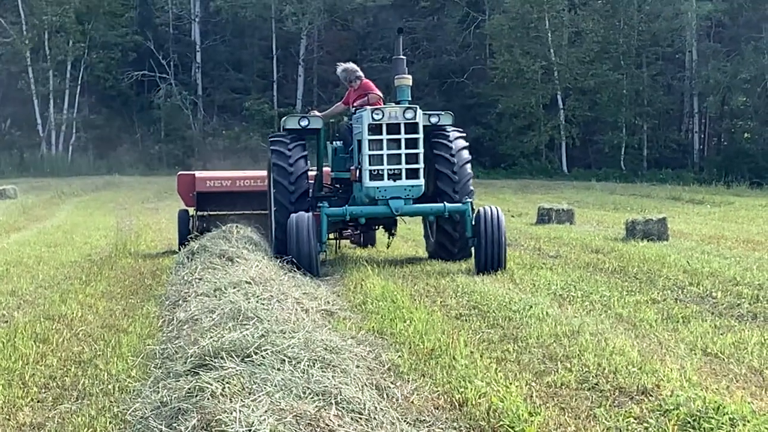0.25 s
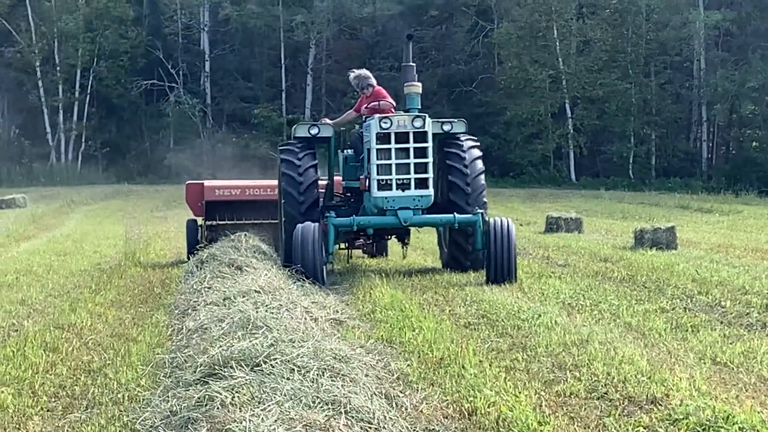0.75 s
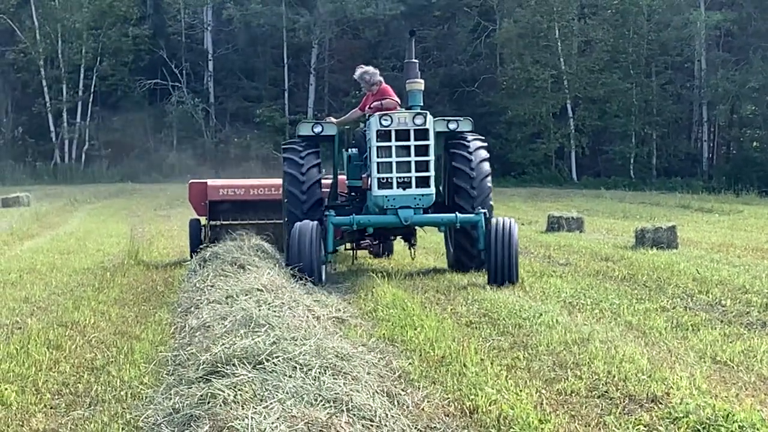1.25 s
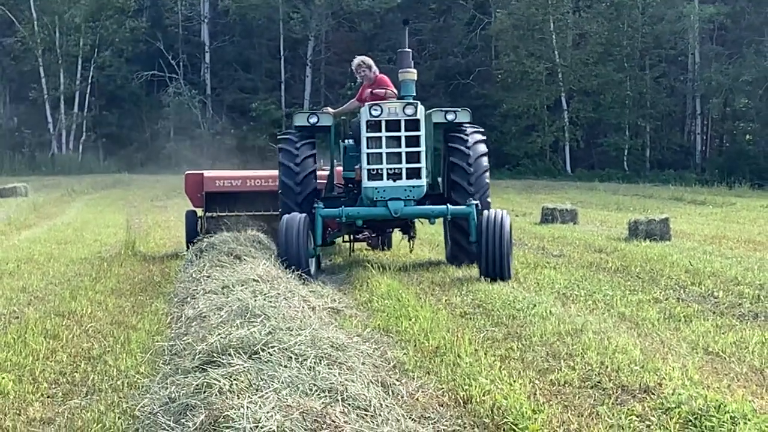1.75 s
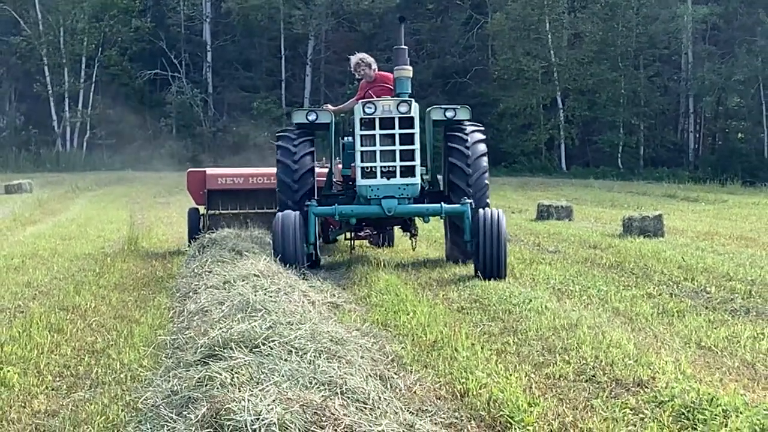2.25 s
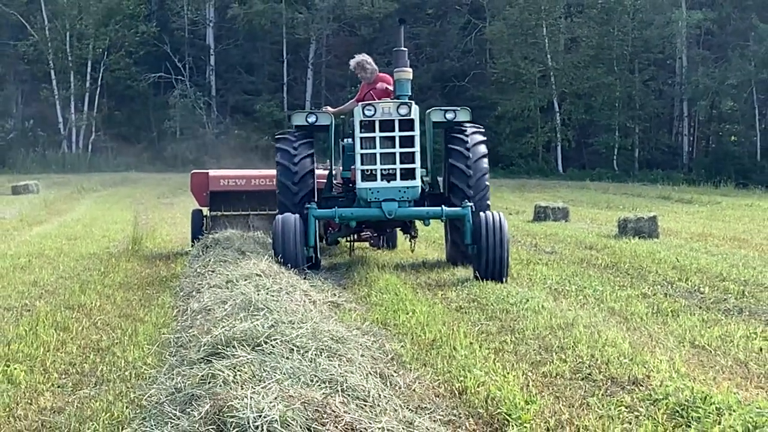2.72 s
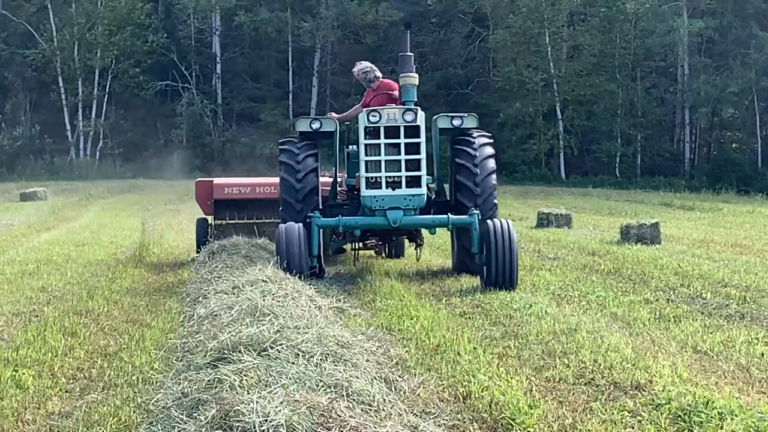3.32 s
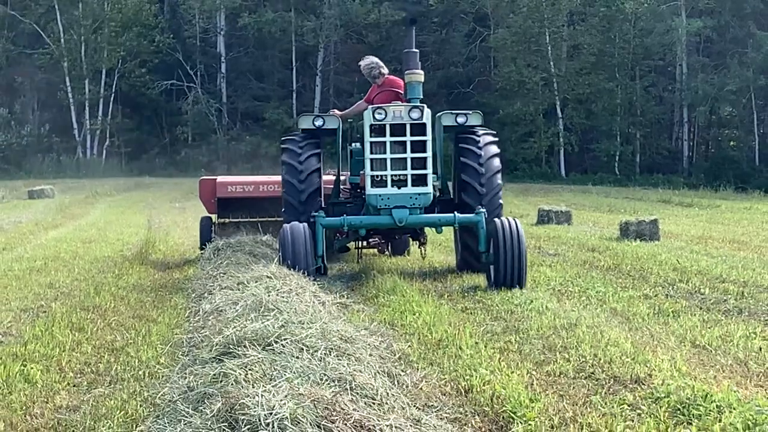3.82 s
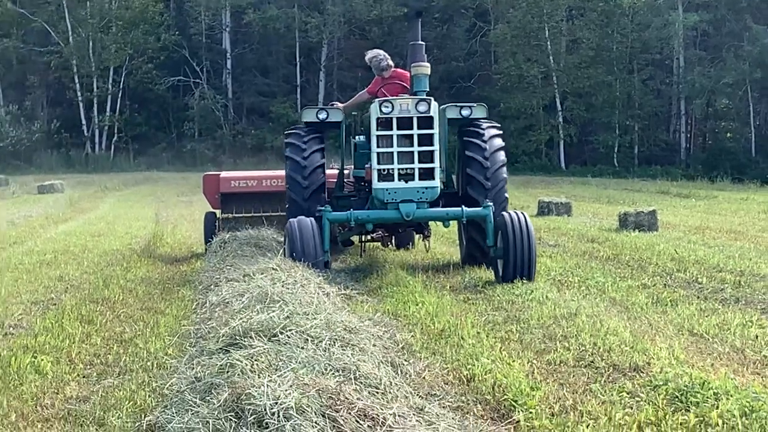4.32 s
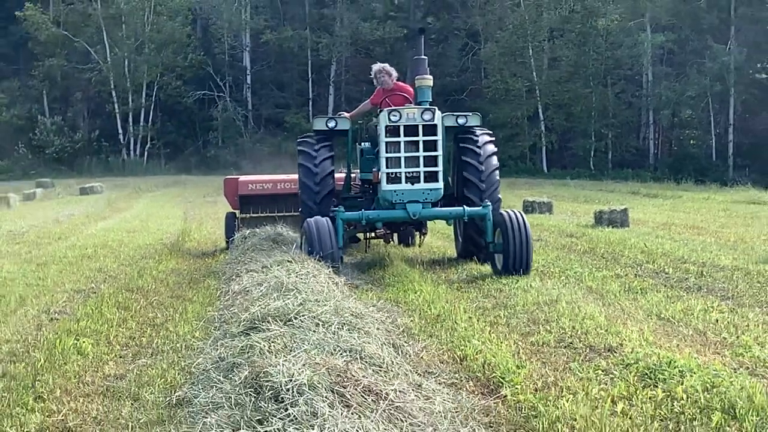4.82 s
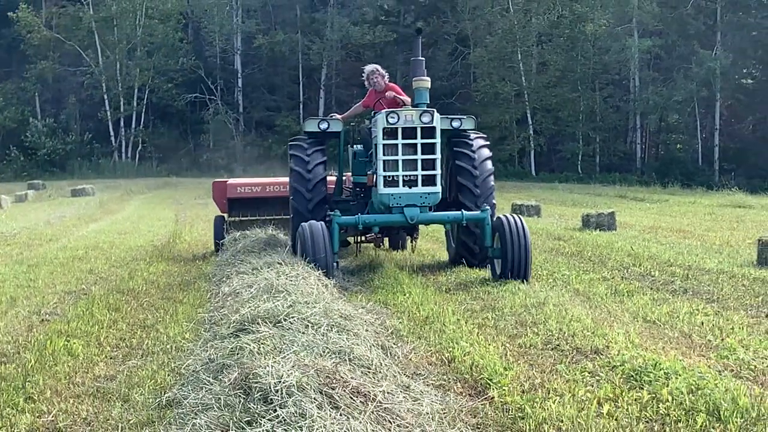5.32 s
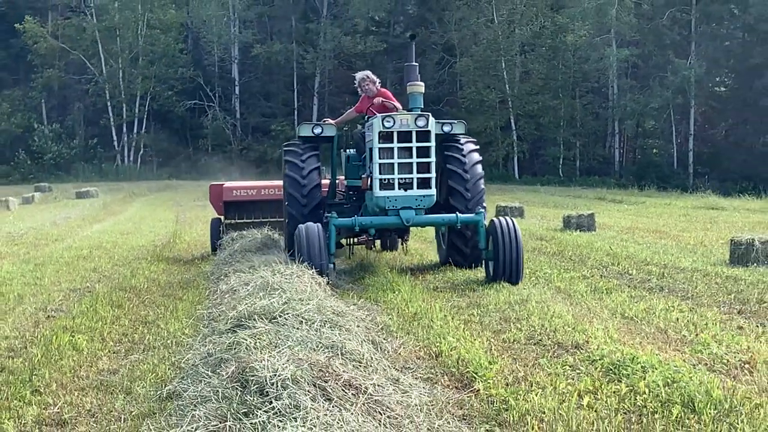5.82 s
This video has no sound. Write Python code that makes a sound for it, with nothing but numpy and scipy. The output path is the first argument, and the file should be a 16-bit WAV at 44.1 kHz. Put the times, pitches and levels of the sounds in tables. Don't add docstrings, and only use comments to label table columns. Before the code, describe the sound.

A diesel tractor drones steadily nearer across an open field, its engine sagging under each baler stroke while metal tines and chains rattle.

```python
import sys
import numpy as np
from scipy import signal
from scipy.fft import rfft, irfft, next_fast_len
from scipy.io import wavfile
from scipy.ndimage import uniform_filter1d, map_coordinates

SR = 44100
rng = np.random.default_rng(int(sys.argv[2]) if len(sys.argv) > 2 else 0)


def unload_wav(signal):
    wavfile.write(
        sys.argv[1],
        SR,
        np.round(np.clip(np.atleast_2d(signal).T, -1, 1) * 32767).astype(np.int16),
    )


def makeup_ratio(level_db):
    decades = np.asarray(level_db, float) / 20
    return 10 ** decades


N = 267687


def unit(x):
    return x / np.sqrt(np.mean(x ** 2) + 1e-20)


def cosine(turns):
    return np.cos(2 * np.pi * turns)


def along(points, hz):
    f, v = np.transpose(points)
    return np.interp(np.log(hz + 1), np.log(f + 1), v)


def wobble(knots_per_s):
    knots = rng.standard_normal(int(N * knots_per_s / SR) + 4)
    return map_coordinates(knots, [np.arange(N) * knots_per_s / SR])


def bumps(times_s, sizes, rise_s, fall_s):
    u = np.arange(0, N + 64, 64)[:, None] / SR - np.asarray(times_s)
    bells = np.exp(-.5 * (u / np.where(u < 0, rise_s, fall_s)) ** 2)
    total = bells @ np.asarray(sizes)
    return np.interp(np.arange(N) / 64, np.arange(len(total)), total)


def filtered(x, response):
    m = next_fast_len(N + 8192)
    return irfft(rfft(x, m) * response(np.fft.rfftfreq(m, 1 / SR)), m)[..., :N]


def rush(spectrum, source=None):
    if source is None:
        source = rng.standard_normal((2, N))
    return unit(filtered(source, lambda hz: makeup_ratio(along(spectrum, hz))))


def ringing(hz, width_hz):
    def resonance(f):
        return (f * width_hz / (hz * hz - f * f + 1j * f * width_hz)) ** 2
    return unit(filtered(rng.standard_normal((2, N)), resonance))


def lines(orders, cycle, drift_db, knots_per_s):
    total = 0
    for order, db in orders:
        swell = makeup_ratio(db + drift_db * wobble(knots_per_s))
        phase = rng.random() * (abs(order - 6) > 2)
        total = total + swell * cosine(order * cycle + phase)
    return total


# (hardest squeeze [s], speed lost [firings/s])
STROKES = [
    (-.5571, 3.37),
    (.6905, 3.5),
    (1.9055, 3.42),
    (3.1383, 3.21),
    (4.346, 4.01),
    (5.5697, 3.46),
]
SQUEEZE_S, RECOVER_S = .0997, .1437
FEED_LAG_S, FEED_SHARE, FEED_IN_S, FEED_OUT_S = .5197, .4077, .1787, .1208


def drag(lag_s=0):
    s, lost = np.transpose(STROKES)
    plunger = bumps(s + lag_s, lost, SQUEEZE_S, RECOVER_S)
    forks = bumps(s + lag_s + FEED_LAG_S, FEED_SHARE * lost, FEED_IN_S, FEED_OUT_S)
    return plunger + forks


# (time [s], gain [dB])
APPROACH = [(0, 0.2), (.7, 2.1), (1.5, 4), (3, 8.4), (4.5, 12.5), (6.07, 16)]
THROTTLE_LAG_S = 0.12


def level(law, lag_s=0):
    start_db, share, load_db = law
    time_s, gain_db = np.transpose(APPROACH)
    approach_db = np.interp(np.arange(N) / SR, time_s, gain_db)
    return start_db + share * approach_db + load_db * drag(lag_s)


# (order [per four-stroke cycle], level [dB]); order 9 is played apart
EXHAUST = [(3, -41), (4, -33), (5, -24), (6, -0.0), (7, -29.5), (8, -29.5), (9, -9), (11, -30), (12, -21.5),
           (13, -34.5), (15, -25.5), (18, -27.5), (20, -33.5), (23, -40)]
# (multiple of blade rate, level [dB])
FAN = [(2, -27), (4, -38)]
# (frequency [Hz], density [dB/Hz])
PUFF = [(35, -47), (60, -7), (100, 3), (180, 0.5), (270, -5.5), (320, -12.5), (400, -25.5), (520, -40.5)]
FAN_ORDER, FAN_TURN, NINTH_TURN = 8.819, .47, .11
NINTH_LAW, BLADE_LAW = (-11.5, .01, 0.87), (-7, .01, -1.1)


def exhaust(cycle, near_db):
    blades = FAN_ORDER * cycle + FAN_TURN
    ninth = makeup_ratio(level(NINTH_LAW, THROTTLE_LAG_S)) * cosine(9 * cycle + NINTH_TURN)
    fan = makeup_ratio(level(BLADE_LAW, THROTTLE_LAG_S)) * cosine(blades)
    fan = fan + sum(makeup_ratio(db) * cosine(k * blades) for k, db in FAN)
    orders = [row for row in EXHAUST if row[0] != 9]
    drone = lines(orders, cycle, drift_db=0.22, knots_per_s=14) + ninth + fan
    puffs = makeup_ratio(-12.0 + 1.1 * wobble(4.4)) * rush(PUFF)
    return makeup_ratio(near_db) * (np.sqrt(2) * drone * [[1], [0]] + puffs)


# (frequency [Hz], density [dB/Hz])
BLOCK = [(250, -42), (400, -9), (560, -2.5), (680, -2), (800, 1.5), (1000, -2.5), (1200, -0.5), (1450, -2),
         (1650, -1), (2000, -13), (2250, -9.5), (2550, -11.5), (3200, -20.5), (4000, -57)]
# (frequency [Hz], width [Hz], level [dB])
PANELS = [(1071, 27, -12), (785.7, 27, -13.5), (1646, 58, -16), (1303, 18, -20.5), (532.4, 33, -21),
          (904, 25, -22)]
# (order [per cycle], level [dB])
GEARS = [(36, -41.5), (37, -43), (42, -40.5), (48, -37), (50, -36.5), (54, -32.5), (58, -31.5), (62, -33),
         (63, -30), (66, -36), (69, -32.5), (72, -30), (86, -35), (87, -33)]
KNOCK_LAW = (-46.5, 0.97, 0.12)


def block(cycle, near_db):
    pattern = rng.standard_normal((2, 3000))
    position = (cycle % 1 * pattern.shape[1]).astype(int)
    repeating = rush(BLOCK, pattern[:, position])
    firing = makeup_ratio(0.67 * cosine(6 * cycle) + 0.086 * cosine(cycle))
    fresh = unit(firing * rush(BLOCK))
    panels = sum(makeup_ratio(db) * ringing(hz, width_hz) for hz, width_hz, db in PANELS)
    knock = makeup_ratio(-4) * repeating + fresh + panels
    timing = makeup_ratio(-25) * np.cos(2 * np.pi * 40 * cycle + .5 * wobble(4))
    gears = lines(GEARS, cycle, drift_db=-1.9, knots_per_s=3.16) + timing
    return makeup_ratio(level(KNOCK_LAW) - 1.8) * knock + makeup_ratio(near_db + 0.5) * gears * [[1], [0]]


# (frequency [Hz], width [Hz])
CASINGS = [
    (1103, 7.1),
    (1212, 10.4),
]
# (start [dB], share of approach gain, load [dB per firing/s lost])
WHINE_LAWS = [
    (-61, 0.84, .6),
    (-63, 0.42, 2),
]
# (order [per cycle], level [dB])
MESH = [
    [(74, -6), (75, 0)],
    [(82, 0), (84, 2)],
]
# (time [s], lower level [dB], upper level [dB])
SINGS = [(.66, 4, 4), (1.25, 9, 1), (1.98, 2, 4.5), (3.24, -2, 12), (3.7, .3, 4), (4.4, 5, 6),
         (4.82, 7, .3), (5.07, 7, .3), (5.55, 4, 3), (5.75, 4, 2), (6.0, 10, -2.5)]
CASING_REACH_HZ, SING_S = 22, 0.075


def whine(cycle):
    out, cycle_hz = 0, np.gradient(cycle) * SR
    s, *sings = np.transpose(SINGS)
    for (hz, width_hz), law, orders, sing_db in zip(CASINGS, WHINE_LAWS, MESH, sings):
        swell_db = bumps(s, sing_db, SING_S, SING_S)
        ring = ringing(hz, width_hz)
        steadied = unit(ring / np.abs(signal.hilbert(ring)) ** 0.56)
        out = out + makeup_ratio(level(law) + swell_db + 1.6 * wobble(6)) * steadied
        for order, db in orders:
            flare = 1 / (1 + ((order * cycle_hz - hz) / CASING_REACH_HZ) ** 2)
            tone = np.cos(2 * np.pi * (order * cycle + rng.random()) + 0.61 * wobble(5))
            tone_db = level(KNOCK_LAW) - 11.5 + db + .6 * swell_db + 1.8 * wobble(5.1)
            out = out + makeup_ratio(tone_db) * flare * tone * [[1], [0]]
    return out


# (frequency [Hz], density [dB/Hz])
TINES = [(2000, -50), (2600, 2), (2850, -8.5), (3300, 0), (3550, -.5), (3800, -2.5), (4400, -3),
         (5000, -9.5), (6200, -12), (7500, -16), (9000, -45)]
# (frequency [Hz], density [dB/Hz])
CHAINS = [(4000, -17), (5500, -21), (6200, -2), (7000, 6), (7800, 5), (9000, 8), (11000, -1), (13000, -0.5),
          (14500, -42), (15700, -36), (16000, -38.5)]
# (start [dB], share of approach gain, load [dB per firing/s lost])
RATTLE_LAWS = [
    (-61.5, 1, 0.35),
    (-66, 0.6, 0.74),
]
# (time [s], tines level [dB], chains level [dB])
JOLTS = [(.33, 0, 2.5), (.72, 2, 0), (1.05, -1.5, 4), (1.58, 1.5, 1), (1.76, 1.5, 3), (2.27, 2.2, 5),
         (2.58, 3.5, 4.5), (3.04, 0.5, 1), (3.14, 4.5, 4), (3.48, 0.5, 5.5), (4.31, 1.5, -1), (4.5, 4, 0),
         (5.1, .6, 1.5), (5.42, 0, 2), (5.49, 4.5, 5.5), (5.71, 1, 5), (6.0, 0, 10)]
JOLT_RISE_S, JOLT_FALL_S = 0.013, 0.027


def pickup(cycle):
    out, (s, *jolts) = 0, np.transpose(JOLTS)
    for law, jolt_db, spectrum, gain_db in zip(RATTLE_LAWS, jolts, (TINES, CHAINS), (3.5, 4.5)):
        jolting_db = bumps(s, jolt_db, JOLT_RISE_S, JOLT_FALL_S)
        level_db = level(law, lag_s=-0.094) + jolting_db + .6 * wobble(7)
        grain_db = 1.15 * wobble(300) + 0.51 * cosine(6 * cycle)
        grains = rng.standard_normal((2, N)) * makeup_ratio(grain_db)
        z = signal.stft(grains, nperseg=512)[2]
        field = uniform_filter1d(rng.standard_normal(z.shape[1:]), size=8, axis=0)
        field = uniform_filter1d(field, size=6, axis=1)
        patchy = signal.istft(z * makeup_ratio(1.5 * unit(field)), nperseg=512)[1][:, :N]
        out = out + makeup_ratio(level_db + gain_db) * rush(spectrum, patchy)
    return out


# (time [s], peak level [dB], pitch [Hz])
CLANKS = [(0.4963, -45, 6720), (0.5586, -49, 4070), (0.7906, -46.5, 4060), (0.9278, -36, 4270),
          (1.715, -36, 4030), (1.7449, -40, 9670), (2.5541, -33, 4130), (2.7397, -32, 4340),
          (2.8589, -33, 3950), (3.6047, -32, 4140), (4.0287, -27, 4060), (4.0721, -29, 4260),
          (4.2088, -39, 4230), (4.3081, -23.5, 3450), (4.4777, -22, 3240), (4.6862, -40, 4270),
          (5.4839, -38, 4390), (5.5179, -33, 3800), (5.5857, -33, 3380), (5.6087, -31, 4620),
          (5.9723, -25, 4400)]
# (time [s], peak level [dB], pitch [Hz])
TICKS = [(0.3177, -49, 10500), (0.4958, -49, 6720), (1.7464, -44, 9670), (1.948, -53, 6840),
         (2.2458, -42, 6990), (2.7462, -47, 6780), (2.8614, -41, 7180), (3.0574, -45, 7060),
         (3.3024, -51, 6780), (3.4256, -38, 9530), (3.8277, -47, 6110), (3.9394, -48, 6280),
         (4.1335, -42.5, 6520), (4.2622, -42, 6000), (4.3021, -39, 6900), (4.4268, -41, 6520),
         (4.5471, -43, 6560), (4.6418, -47, 7010), (4.8294, -42, 6650), (5.013, -45, 7210),
         (5.222, -40, 6910), (5.4839, -41, 6700), (5.7049, -38, 6370), (5.9868, -29, 7040)]


def clanks(events, spread, t60_s, gain_db):
    out, t = np.zeros((2, N + SR)), np.arange(SR // 8) / SR
    for s, db, hz in events:
        edges_hz = [hz / spread, min(hz * spread, SR / 2.2)]
        band = signal.butter(1, edges_hz, "band", fs=SR, output="sos")
        noise = rng.standard_normal((2, len(t)))
        ring = unit(signal.sosfilt(band, noise)) * makeup_ratio(-60 * t / t60_s)
        click = .8 * np.diff(noise, prepend=0) * makeup_ratio(-60 * t / 0.01)
        onset = 1 - np.exp(-t / .0008)
        out[:, round(s * SR):][:, :len(t)] += makeup_ratio(db + gain_db) * onset * (ring + click)
    return out[:, :N]


# (frequency [Hz], density [dB/Hz])
GUST = [(20, -22), (35, -6), (48, 4.5), (65, 11), (85, 0.5), (110, -4), (160, -2), (300, -39)]
# (time [s], level over the lull [dB])
GUSTS = [(.41, 9), (1.2, 4), (1.5, 2), (1.8, 3), (2.3, 4), (2.44, 5), (2.75, 4), (3.1, 10), (3.48, 7),
         (3.6, 0), (3.8, 7), (4.14, 4), (4.37, 5), (4.55, -1), (4.72, -3), (4.92, -1), (5.22, -2), (5.5, 2),
         (5.79, 1), (6.06, 0)]
GUST_RISE_S, GUST_FALL_S = 0.05, 0.036
LULL_DB, FRESHEN_DB_PER_S, LATE_S, LATE_DB_PER_S = -58, 2, 3.05, 4


def breeze():
    shared, own = rush(GUST)
    steady = unit(shared / np.abs(signal.hilbert(shared)) ** .4)
    t = np.arange(N) / SR
    trend_db = LULL_DB + FRESHEN_DB_PER_S * t + LATE_DB_PER_S * np.maximum(t - LATE_S, 0)
    gust_db = trend_db + bumps(*np.transpose(GUSTS), GUST_RISE_S, GUST_FALL_S)
    return makeup_ratio(gust_db) * unit(np.array([steady + 0.56 * own, steady - 0.5 * own]))


# (frequency [Hz], phase [rad])
LEAD = [(500, -.17), (750, .6), (1300, .25), (2000, .9), (2500, 2.95), (2640, 3.2), (2900, 1.9),
        (3400, 2.2), (4200, 1.1), (5300, 2.4), (6300, -.3), (7400, -1.5)]
# (frequency [Hz], correlation [-1..1])
ALIKE = [(60, .96), (1800, .95), (2000, .78), (2250, .93), (2600, .985), (2750, .8), (3300, .93),
         (4500, .82), (5400, .58), (6250, .55), (6600, .8), (7500, .75), (10000, .8), (15000, .7)]
# (frequency [Hz], left minus right [dB])
SHADE = [(60, -1.9), (200, -1.2), (300, 1.5), (600, -8), (950, -.5), (1500, -2), (1900, 0), (2200, -3.5),
         (2600, 0), (3100, -2.5), (3500, 1), (4300, -2.5), (5300, 0), (7000, 0)]
# (from [Hz], to [Hz])
LOCKED = [(7900, 8900), (10350, 11700), (12550, 14350), (15150, 16000)]


def ports(pair):
    steps = [(hz, -np.pi * (k + 1)) for k, span in enumerate(LOCKED) for hz in span]
    lead_hz, lead_rad = np.transpose(LEAD + steps)

    def mix(hz):
        locked = sum((hz > lo) & (hz < hi) for lo, hi in LOCKED)
        turn = (1 - .995 * locked) * np.arccos(along(ALIKE, hz)) / 2
        return np.array([np.cos(turn), np.sin(turn)])

    def split(hz):
        half = makeup_ratio(along(SHADE, hz) / 2) * np.exp(.5j * np.interp(hz, lead_hz, lead_rad))
        return np.array([half, 1 / half])

    direct, scattered = filtered(pair, mix)
    return filtered(np.array([direct + scattered, direct - scattered]), split)


FREE_RATE, RATE_CLIMB, START_FIRING = 90.034, .0189, -.156
DRONE_LAW = (-32, 0.94, 0.27)


def scene():
    firing_rate = FREE_RATE + RATE_CLIMB * np.arange(N) / SR - drag()
    cycle = (np.cumsum(firing_rate) / SR + START_FIRING) / 6
    near_db = level(DRONE_LAW, THROTTLE_LAG_S)
    engine = exhaust(cycle, near_db) + block(cycle, near_db) + whine(cycle)
    loose = clanks(CLANKS, spread=1.1, t60_s=0.1, gain_db=-15)
    links = clanks(TICKS, spread=1.08, t60_s=0.075, gain_db=-6)
    baler = pickup(cycle) + loose + links
    return ports(engine + baler) + breeze()


def top_cut(x):
    return signal.sosfilt(signal.butter(12, 17080, fs=SR, output="sos"), x)


TOP_HZ = 15750


def record(dry):
    mix = filtered(dry, lambda hz: hz < TOP_HZ)
    return top_cut(mix)


dry = scene()
out = record(dry)
unload_wav(out)
```